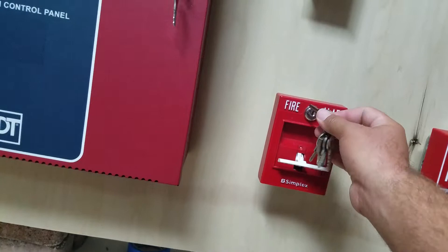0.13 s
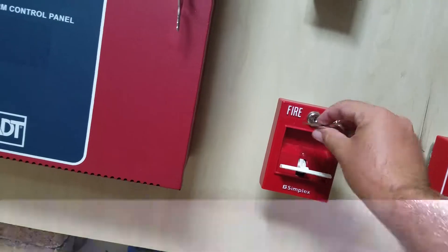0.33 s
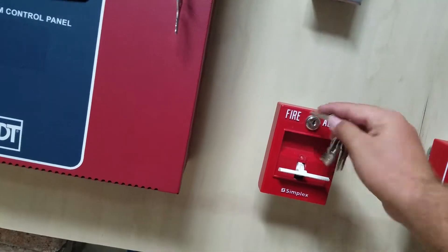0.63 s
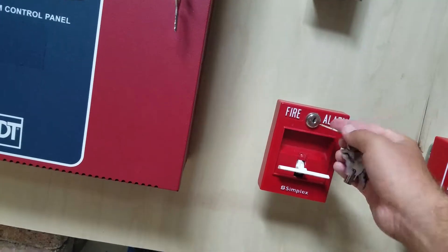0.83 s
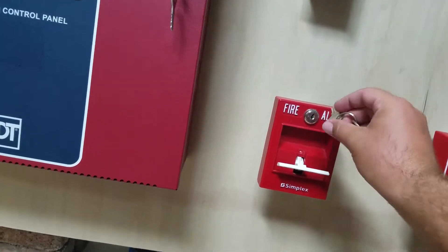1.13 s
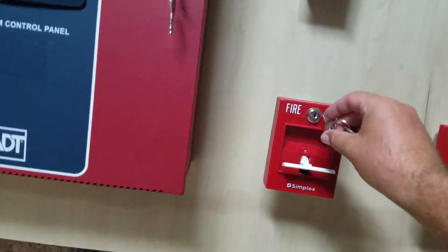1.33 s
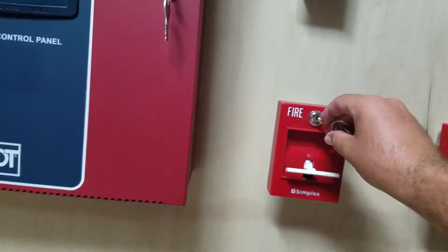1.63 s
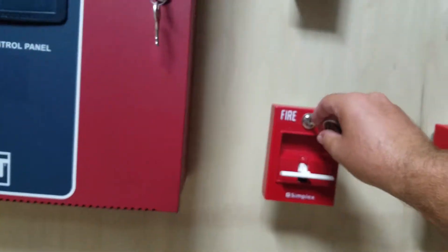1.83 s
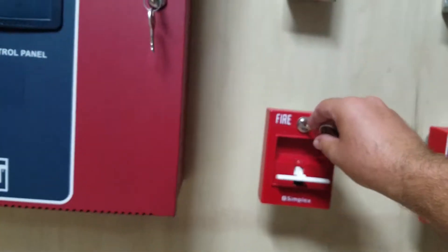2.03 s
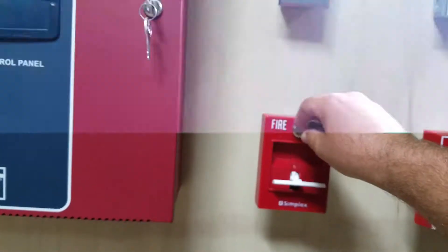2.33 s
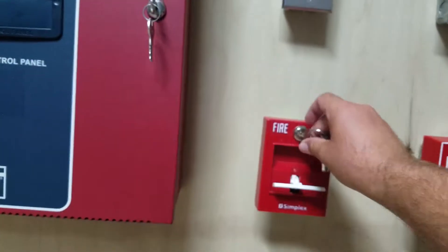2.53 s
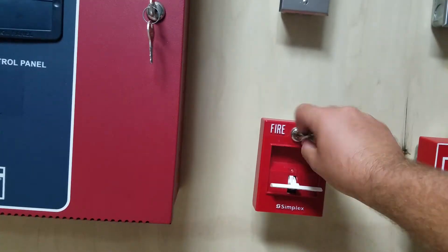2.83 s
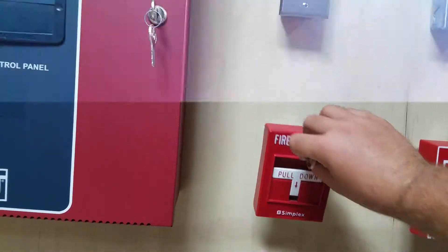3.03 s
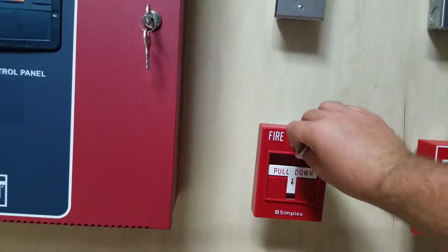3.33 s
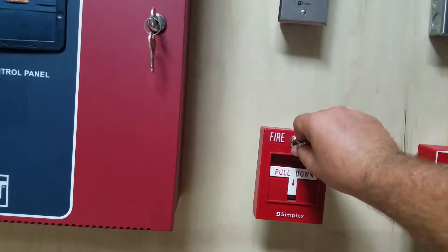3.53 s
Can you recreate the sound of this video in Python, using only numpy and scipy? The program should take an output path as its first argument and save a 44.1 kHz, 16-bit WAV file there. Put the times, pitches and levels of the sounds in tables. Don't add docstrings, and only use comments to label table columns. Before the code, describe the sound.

Close up in a small hard room, keys jangle, pause, then knock and scrape inside a metal lock; a sharp double clack follows, with a short echo, faint last clicks and low hum beneath.

```python
import sys
import numpy as np
from scipy import signal
from scipy.fft import rfft, irfft
from scipy.io import wavfile
from scipy.ndimage import uniform_filter1d

SR = 44100
rng = np.random.default_rng(int(sys.argv[2]) if len(sys.argv) > 2 else 0)


def level_to_linear(level):
    exponent = np.asarray(level, float) / 20
    return 10 ** exponent


def output_pcm(signal):
    pcm = np.clip(np.atleast_2d(signal).T, -1, 1) * 32767
    wavfile.write(sys.argv[1], SR, np.round(pcm).astype(np.int16))


N = 163170

# f/Hz, level/dB
CLINK_COLOUR = [(1180, -11), (2000, -3), (3450, -1), (7090, -2), (8680, 7.5), (15000, 14.5), (16400, -17)]
# f/Hz, level/dB
KNOCK_COLOUR = [(180, -42), (300, 7), (1090, 5.5), (3390, -3), (3810, -4.5), (5420, -18), (15000, -21),
                (16400, -59)]
# f/Hz, level/dB, time to fall 60 dB/s
BOX_TONES = [(480, -6, .05), (760, -10, 0.04), (975, -2, 0.08), (1110, -9, .04), (1500, -12, 0.025),
             (2150, -15, .02), (3000, -16, 0.02), (3800, -17, .02)]
# f/Hz, level/dB, time to fall 60 dB/s
WALL_TONES = [(217, -5.5, 0.12), (290.2, -14, 0.25), (404, -7, 0.069)]


def read(points, hz):
    f, v = np.transpose(points)
    return np.interp(np.log(hz + 1), np.log(f + 1), v)


def curve(points):
    return np.interp(np.arange(N) / SR, *np.transpose(points))


def evened(x):
    return x / np.sqrt(np.mean(x ** 2) + 1e-20)


def tint(x, table, share=1):
    n = x.shape[-1]
    gain = level_to_linear(share * read(table, np.fft.rfftfreq(n, 1 / SR)))
    return irfft(rfft(x) * gain, n)


def add(mix, s, sound):
    part = mix[..., round(s * SR):][..., :sound.shape[-1]]
    part += sound[..., :part.shape[-1]]


def rings(modes, t, detune=0.0023, damp=0.72, spread_db=-1.5):
    luck = np.clip(rng.standard_normal((len(modes), 3)), -1.2, 1.2)
    total = 0
    for (hz, db, t60), (louder, sharper, phase) in zip(modes, luck):
        fade = level_to_linear(db + spread_db * louder - 60 * damp * t / max(t60, .003))
        total = total + fade * np.sin(2 * np.pi * hz * (1 + detune * sharper) * t + phase)
    return total


def rattle(t, length, table, rise, treble_db=0):
    clumps = evened(uniform_filter1d(rng.standard_normal(len(t)), size=30))
    spikes = rng.standard_normal((2, len(t))) * level_to_linear(2.5 * clumps)
    spikes[1] = .8 * spikes[0] + .6 * spikes[1]
    shape = np.exp(-(t / max(length, .001)) ** 2) + level_to_linear(-16.0 - 60 * t / 0.2)
    coloured = tint(evened(tint(spikes, table)), [(2500, 0.02), (6500, treble_db)])
    return coloured * np.minimum(t / rise, 1) * shape


def clink(db, hz, ring_db):
    # f/Hz, level/dB, time to fall 60 dB/s
    long_key = [(8750, -21, .09), (12250, -20, .04), (14480, -9, .11)]
    short_key = [(13100, -9, .04), (15100, 3.5, .18)]
    t = np.arange(0, .3, 1 / SR)
    key, pan_db = (short_key, -5) if hz > 14900 else (long_key, 6)
    tones = [*key, *key]
    ping = level_to_linear(-5.5) * rings([(hz, 0, .01)], t)
    ring_shape = level_to_linear(ring_db) * (0.21 + 0.8 * np.exp(-t / 0.0049))
    ringing = ring_shape * np.array([rings(tones, t), rings(tones, t)])
    struck = np.minimum(t / 0.00049, 1) * (ping + ringing)
    pan = level_to_linear(np.array([[pan_db], [-pan_db]]) / 2)
    return level_to_linear(db) * pan * (level_to_linear(-9.0) * rattle(t, 0.006, CLINK_COLOUR, 0.0017) + struck)


def shake():
    start_s, end_s, level_db = 0.723, .85, -47
    t = np.arange(N) / SR
    gate = np.clip((t - start_s) / 0.045, 0, 1) * (t < end_s)
    clumps = evened(uniform_filter1d(rng.standard_normal(N), size=120))
    chatter = evened(tint(rng.standard_normal((2, N)), CLINK_COLOUR))
    return level_to_linear(level_db + 7.3 * clumps) * gate * chatter * level_to_linear(np.array([[3.], [-3.]]))


def jingle():
    # t/s, peak level/dB, loudest ring f/Hz, long ring level/dB
    touches = [(0.0522, -35, 11900, -6), (0.0717, -37, 14100, -2), (0.1423, -24, 14000, 0),
               (0.197, -36.5, 14300, 5), (0.293, -40, 14000, -4), (0.3483, -40, 15100, 0),
               (0.408, -41.5, 11000, -20), (0.5789, -25, 14300, 7), (0.6, -30, 14500, 5.5),
               (0.613, -35, 11500, -14), (0.7244, -28.5, 14300, -9), (0.7417, -25, 12400, -15),
               (0.7672, -26, 15400, -25), (0.7871, -20.5, 8700, -29), (0.802, -23.5, 8800, -20),
               (0.8098, -24.5, 14400, 4), (0.821, -28, 14000, -20), (0.83, -31, 13300, -20),
               (0.839, -22, 12350, -24), (0.9285, -31, 10600, -30), (0.945, -41, 14100, -25),
               (0.9996, -42, 13200, -13), (1.0164, -37.5, 15100, -4), (1.6835, -45.5, 15100, 1),
               (3.488, -48, 14840, -4), (3.6155, -36.5, 15700, -20), (3.684, -45, 15100, -7.5)]
    keys = shake()
    for s, *row in touches:
        add(keys, s, clink(*row))
    return keys


def knock(table, modes, rise_s, db, treble_db, thump_db, modes_db, length):
    t = np.arange(0, .3, 1 / SR)
    crack = rattle(t, length, table, rise_s, treble_db + 24.0)
    body = np.minimum(t / rise_s, 1) * level_to_linear(modes_db) * rings(modes, t, detune=0.0168, spread_db=5)
    thump = np.minimum(t / 0.0013, 1) * level_to_linear(thump_db) * rings(WALL_TONES, t, detune=0.022)
    return level_to_linear(db) * (level_to_linear(-11) * crack + body + thump)


def lock_knocks(lock):
    # t/s, peak level/dB, treble level/dB, thump level/dB, box ring level/dB
    going_in = [(1.476, -26.5, -18, -18, -22), (1.491, -28, -33, -11, -17), (1.512, -26.5, -53, -9, -7.5),
                (1.54, -34, -14, -35, -24), (1.546, -14.5, -19.5, -31, -24), (1.564, -26, -27, -13, -12.5),
                (1.58, -21.5, -27, -17, -4), (1.636, -34, -19, -26, -10.5), (1.853, -24, -19, -39, -17),
                (2.267, -16.5, -12, -13, -12), (2.283, -29, -17, -24, -11), (2.342, -23.5, -20, -25.5, -19),
                (2.349, -23.5, -32.5, -24, -6), (2.41, -30, -6, -34.5, -19.5),
                (2.424, -22.5, -31, -24.5, -17.5), (2.437, -27, -33, -24.5, -9.5),
                (2.475, -33, -12, -21, -13.5), (2.495, -16, -22.5, -38, -10.5),
                (2.512, -23.5, -30.5, -21.5, -5.5), (2.53, -28.5, -17.5, -22.5, -12),
                (2.561, -24, -10.5, -10.5, -24), (2.568, -23.5, -20.5, -3.5, -23),
                (2.592, -15.5, -14.5, -15.5, -7)]
    turning = [(2.758, -29, -17, -6.5, -18), (2.787, -25, -28, -17, -18), (2.809, -24.5, -13, -5, -18),
               (2.832, -28.5, -22, -1, -10), (2.881, -10, -17, -5, -16), (2.892, -19.5, -18, -10.5, -24.5),
               (2.927, -17.5, -22, -4, -31), (3.316, -36.5, -33.5, -6, -18),
               (3.424, -33.5, -16, 2.5, -21.5), (3.429, -23.5, -20, -13.5, -16.5),
               (3.594, -41, -23, -11, -11.5), (3.615, -41.5, -11, -10, -20), (3.677, -37, -13.5, -11, -14)]
    # t/s, peak level/dB, treble level/dB, thump level/dB, box ring level/dB
    ticks = [
        (1.393, -51, 1, -30, -20),
        (1.833, -29.5, -24, -37, -17),
        (1.842, -24.5, -24, -38, -22),
        (2.128, -39.5, -16, -30, -30),
        (2.219, -29.5, -17.5, -25, -33),
        (2.23, -41, -17, -25, -22),
        (2.75, -29.5, -20, -3, -15),
    ]
    for events in (going_in, turning):
        for s, *row in events:
            add(lock, s, knock(KNOCK_COLOUR, BOX_TONES, 0.00096, *row, 0.01))
    for s, *row in ticks:
        add(lock, s, knock(KNOCK_COLOUR, BOX_TONES, .0004, *row, .003))


def handle_snap(lock):
    # t/s, peak level/dB, treble level/dB, thump level/dB, rattle length/s
    hits = [
        (2.9491, -1.5, -16, -24, .007),
        (2.9697, -3.5, -22, -30, .0018),
        (2.976, -13, -26, -30, .003),
        (2.984, -7, -28, -30, .0025),
        (2.9935, -13, -30, -30, .003),
        (2.9995, -12, -30, -30, .005),
        (3.018, -16, -28, -30, .006),
    ]
    # f/Hz, level/dB
    clack_colour = [(300, -16), (900, -3), (1600, 1), (2300, -6), (3250, 6), (5300, -17), (6600, -8),
                    (16000, -18.5)]
    # f/Hz, level/dB, time to fall 60 dB/s
    handle_tones = [(920, -14, .03), (1600, -15, 0.02), (2630, -17, .03), (3030, -14, .035),
                    (3245, -14, .035), (3470, -15, .03), (3680, -18, .03)]
    for s, *row, length in hits:
        add(lock, s, knock(clack_colour, handle_tones, 0.00025, *row, -8, length))


def rub():
    # t/s,
    # level/dB
    pressure = [(0, -40), (.04, -51), (.2, -66), (2.26, -63.5), (2.3, -45), (2.39, -47), (2.43, -44),
                (2.47, -42), (2.53, -32.5), (2.56, -40.5), (2.73, -50), (2.76, -36), (2.87, -41),
                (2.93, -44), (2.95, -36.5), (2.97, -83.5), (3.58, -61), (3.62, -51.5), (3.7, -48)]
    strength = level_to_linear(0.43 * np.minimum(rng.exponential(1, N), 3))
    happens = rng.random(N) < 5000 / SR
    slips = rng.standard_normal((2, N)) * strength * happens
    slips *= level_to_linear(2.63 * evened(uniform_filter1d(rng.standard_normal(N), size=400)))
    slips[1] = slips[0] + slips[1]
    t = np.arange(0, .2, 1 / SR)
    body = signal.fftconvolve(slips, rings(BOX_TONES, t, damp=0.65)[None])[:, :N]
    board = signal.fftconvolve(slips[:1], rings(WALL_TONES, t, damp=6.8)[None])[:, :N]
    scrape = evened(tint(slips, KNOCK_COLOUR))
    return level_to_linear(curve(pressure)) * (scrape + level_to_linear(-14) * evened(body) + level_to_linear(-1.0) * evened(board))


def lean(x, left_share, right_share):
    # f/Hz, level/dB
    side_colour = [(60, -3.5), (250, -2), (1300, 4), (2400, 8), (4400, 7), (8000, 3.5)]
    return np.array([tint(x[0], side_colour, left_share), tint(x[1], side_colour, right_share)])


def pair(x):
    # f/Hz, likeness (0 to 1)
    likeness = [(60, 0.24), (130, 1), (400, 0.92), (1400, 0.019)]
    z = rfft(x)
    c = np.clip(read(likeness, np.fft.rfftfreq(N, 1 / SR)), 0, 1)
    return irfft([z[0], c * z[0] + np.sqrt(1 - c ** 2) * z[1]], N)


def room(x):
    # f/Hz, time to fall 60 dB/s
    ring_time = [(300, 0.41), (2700, 0.41), (6000, 0.42), (14000, 0.32)]
    # f/Hz, level/dB
    echo_colour = [(200, -1.5), (3200, -2), (6000, -3), (16000, -5.5)]
    out = np.zeros((2, N))
    turn = np.arange(N) / SR * 60
    for k in range(3):
        taps = np.zeros((2, SR))
        slots = np.arange(300, SR - 20, 10)[None]
        at = slots + rng.integers(0, 10, (2, (SR - 311) // 10))
        np.put_along_axis(taps, at, rng.choice([-1., 1.], at.shape), 1)
        echoes = pair(np.pad(taps, ((0, 0), (0, N - SR))))[:, :SR]
        hz, t, z = signal.stft(echoes, SR, nperseg=256)
        fade = level_to_linear(-60 * t / read(ring_time, hz)[:, None])
        tail = signal.istft(z * fade, SR, nperseg=256)[1]
        tail *= np.clip((np.arange(tail.shape[1]) / SR - .012) / .012, .1, 1)
        feed = x * np.sqrt(2 / 3) * np.cos(np.pi * (turn + k / 3))
        out += signal.fftconvolve(feed[None], tail / np.linalg.norm(tail[0]), axes=1)[:, :N]
    return tint(out, echo_colour)


def gusts():
    # t/s, level/dB
    hand_air = [(0, -57.5), (.6, -52), (.76, -37.5), (.95, -39), (1.15, -51.5), (1.5, -77), (2.4, -63.5),
                (2.9, -46), (3.2, -43.5), (3.5, -60)]
    # f/Hz, level/dB
    gust_colour = [(20, -30.5), (50, 0), (110, 2.5), (300, -8.5), (700, -30.5)]
    lumps = uniform_filter1d(rng.standard_normal((2, N)), size=900)
    lumps = evened(uniform_filter1d(lumps, size=900))
    noise = rng.standard_normal((2, N))
    noise[1] = 0.22 * noise[0] + 0.27 * noise[1]
    return level_to_linear(curve(hand_air) + 2 * lumps) * evened(tint(noise, [*gust_colour, (2000, -83.0)]))


def air():
    # t/s, level/dB
    recorder_gain = [(0, 1.5), (.25, 1), (1.4, 0), (1.5, -1), (2.9, -2), (3.2, -9.5), (3.7, -12)]
    # f/Hz, level/dB
    air_colour = [(30, -17.5), (110, -8.5), (175, -27), (330, -8.5), (1200, -25), (3300, -31), (9000, -35),
                  (15000, -30.5)]
    # f/Hz, width/Hz, level/dB
    hum_lines = [
        (125, 10, -56),
        (239.5, 1.9, -58),
        (678, 9.8, -66),
        (972, 8, -71.5),
        (3300, 530, -67),
        (13500, 40, -71.5),
    ]
    hz, gain_db = np.fft.rfftfreq(N, 1 / SR), curve(recorder_gain)
    out = level_to_linear(-55.5 + gain_db) * evened(tint(pair(rng.standard_normal((2, N))), air_colour))
    for f, width, db in hum_lines:
        peak = 1 + ((hz - f) / width) ** 2
        line = evened(irfft(rfft(pair(rng.standard_normal((2, N)))) / peak, N))
        out += level_to_linear(db + gain_db * (4.5 if f < 300 else 1.1)) * line
    return out


def scene():
    lag = 3
    keys = jingle()
    lock = rub()
    lock_knocks(lock)
    handle_snap(lock)
    lock = tint(lock, [(90, -11), (190, -1.0)])
    near = lean(lock, 1.0, -0.036)
    near[0] = np.roll(near[0], lag)
    near += [np.roll(keys[0], -lag), keys[1]]
    to_room = level_to_linear(-5.0) * lock.mean(0) + level_to_linear(-6.5) * keys.mean(0)
    wet = room(to_room) + air() + gusts()
    return near + lean(wet, 0.64, -0.06)


def roll_off(x):
    return signal.sosfilt(signal.butter(12, 16500, fs=SR, output="sos"), x)


def record(dry):
    edge = signal.firwin(401, 15950, window=("kaiser", 11), fs=SR)
    mix = signal.oaconvolve(np.clip(dry, -1, 1), edge[None], "same")
    return roll_off(mix)


dry = scene()
out = record(dry)
output_pcm(out)
```